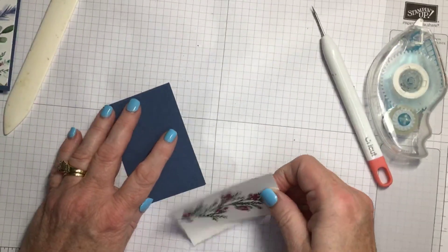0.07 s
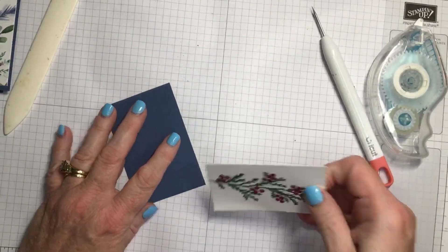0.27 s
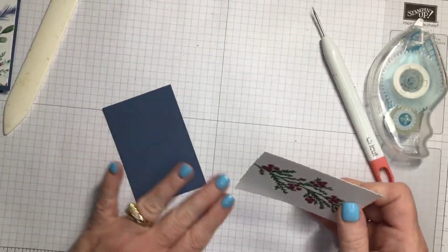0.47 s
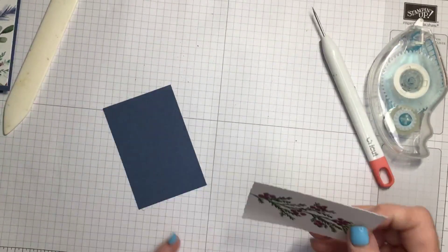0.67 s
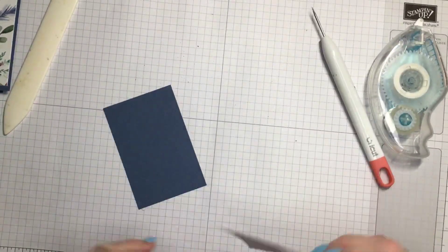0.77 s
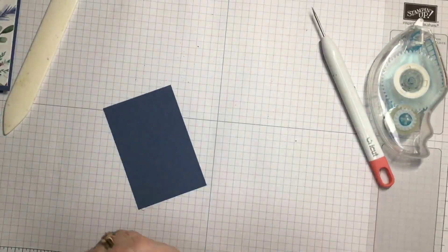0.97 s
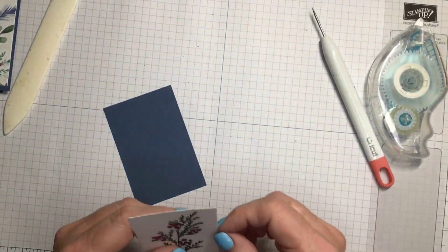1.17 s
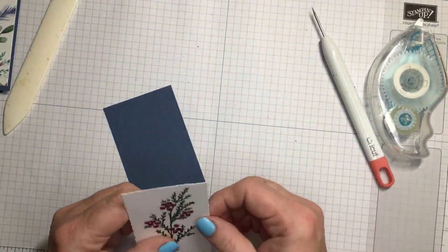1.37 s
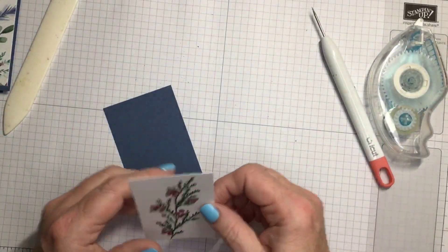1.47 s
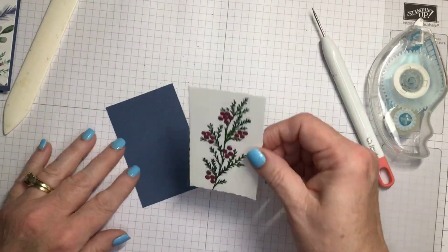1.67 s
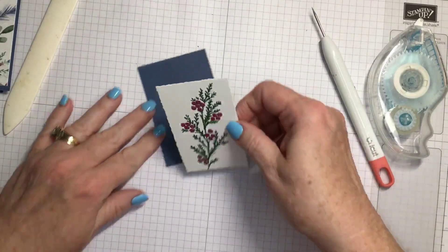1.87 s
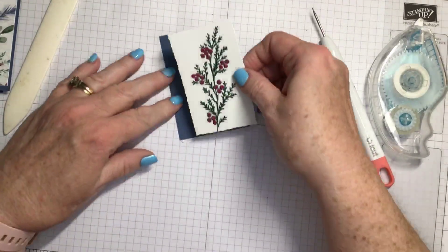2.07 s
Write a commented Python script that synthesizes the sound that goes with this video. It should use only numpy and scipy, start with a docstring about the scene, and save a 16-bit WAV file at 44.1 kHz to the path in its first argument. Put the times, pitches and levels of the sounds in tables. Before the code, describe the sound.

A stiff, tacky paper card snaps twice in quick succession, the second much louder with a small table thump, then rubs, ticks and taps lightly; close microphone in a small quiet room with a faint low engine drone.

```python
"""Room noise and a faint low drone, like an engine outside that changes gear, lie under hands sliding on paper.
A stiff paper panel, tacky with tape-runner adhesive, is handled over a craft table in a small room.
It snaps twice as it flicks free, then ticks and taps as it is turned and laid down; its edge rasps.
Snaps and taps are impulses through card resonances and a room; rubbing is dense filtered grains;
the background is shaped noise plus wavering sines."""
import sys
import numpy as np
from scipy import signal
from scipy.fft import rfft, irfft, next_fast_len
from scipy.io import wavfile
from scipy.ndimage import uniform_filter1d

SR = 44100
rng = np.random.default_rng(int(sys.argv[2]) if len(sys.argv) > 2 else 0)


def int16_out(signal):
    """Quantize to a 16-bit WAV file."""
    q = np.round(np.clip(np.atleast_2d(signal).T, -1, 1) * 32767)
    wavfile.write(sys.argv[1], SR, q.astype(np.int16))


N = 92610
PAD = next_fast_len(N + SR // 4)
HZ = np.maximum(np.arange(PAD // 2 + 1) * SR / PAD, 1)
T = np.arange(N) / SR


def from_db(db):
    """Decibels to amplitude gain."""
    return 10 ** (np.asarray(db) / 20)


def rms_one(x):
    """Scale to unit rms."""
    return x / np.sqrt(np.mean(x ** 2) + 1e-20)


def colour(points):
    """Gain at every HZ, interpolated on log frequency from (frequency [Hz], level [dB]) points."""
    hz, db = np.transpose(points)
    return from_db(np.interp(np.log(HZ), np.log(hz), db))


def filtered(x, response):
    """Pass a sound through a frequency response."""
    return irfft(rfft(x, PAD) * response, PAD)[:N]


def delay(time_s):
    """Spectrum of a unit impulse at time_s."""
    return np.exp(-2j * np.pi * HZ * time_s)


def bandpass(hz, width_hz):
    """Second-order resonator with unit gain at its peak."""
    return 1 / (1 + 1j * (HZ ** 2 - hz ** 2) / (HZ * width_hz))


def resonance(hz, width_hz, boost_db):
    """Ringing peak with unit gain far from its pitch."""
    return 1 + (from_db(boost_db) - 1) * bandpass(hz, width_hz)


def drift(knots_per_s):
    """Slow random curve with unit rms."""
    knots = rng.standard_normal(400)
    return rms_one(np.interp(T * knots_per_s, np.arange(len(knots)), knots))


# engine outside: (time [s], pitch [Hz], level [dB])
ENGINE_TRACK = [(0, 140.3, -57.5), (.25, 143.8, -56), (.40, 146.3, -58), (.48, 150.5, -72.5),
                (.54, 147, -60), (.60, 148.2, -74), (.74, 152.2, -63.5), (.80, 148.8, -63.5),
                (.87, 137.4, -54), (.95, 131.3, -70), (1.06, 119.6, -70), (1.3, 110.8, -72.5),
                (2.1, 117.4, -70)]


def engine():
    """Engine drone: one sine on a pitch track, its level wavering."""
    time_s, pitch_hz, level_db = np.transpose(ENGINE_TRACK)
    phase = 2 * np.pi * np.cumsum(np.interp(T, time_s, pitch_hz)) / SR
    wavering_db = np.interp(T, time_s, level_db) + 0.61 * drift(25.05)
    return np.sqrt(2) * from_db(wavering_db) * np.sin(phase)


# appliance tones: (pitch [Hz], level [dB])
APPLIANCE_TONES = [(188.4, -70.5), (240, -75.5), (1372, -77)]


def hums():
    """Appliance tones: sines with wavering level and phase."""
    total = np.zeros(N)
    for pitch_hz, level_db in APPLIANCE_TONES:
        gain = from_db(level_db + 2.8 * drift(9.14))
        total += gain * np.sin(2 * np.pi * pitch_hz * T + 0.62 * drift(14))
    return np.sqrt(2) * total


FLOOR_RMS_DB, LOW_CUT_HZ = -61, 88
# room noise shape before the low cut: (frequency [Hz], relative level [dB per Hz])
FLOOR_COLOUR = [(60, -33), (100, -21.5), (140, -11), (200, -5), (300, -11), (480, -20.5), (640, -18),
                (900, -21), (1400, -19), (1900, -22.5), (2750, -18.5), (3800, -24.5), (5000, -31),
                (8000, -35.5), (11000, -41), (16000, -39)]


def room_noise():
    """Room noise: white noise shaped by colour and a steep low cut."""
    low_cut = 1 / np.sqrt(1 + (LOW_CUT_HZ / HZ) ** 12)
    noise = filtered(rng.standard_normal(N), colour(FLOOR_COLOUR) * low_cut)
    return from_db(FLOOR_RMS_DB) * rms_one(noise)


STROKE_FADE = 0.36  # share of a stroke spent swelling, and again fading


def friction(strokes, spectrum, grains_per_s, size_db, flutter_db):
    """Paper fibres catch and slip in dense grains while each stroke swells and fades."""
    power = np.zeros(N)
    for start_s, length_s, level_db in strokes:
        inside = np.minimum(T - start_s, start_s + length_s - T) / (length_s * STROKE_FADE)
        swell = np.sin(np.pi / 2 * np.clip(inside, 0, 1))
        power += (from_db(level_db) * swell) ** 2
    hits = (rng.random(N) < grains_per_s / SR) * rng.choice([-1, 1], N)
    sizes = from_db(size_db * np.minimum(rng.exponential(1, N), 4))
    rubbing = rms_one(filtered(hits * sizes, spectrum))
    return np.sqrt(power) * rubbing * from_db(flutter_db * drift(90))


RUB_LOW_HZ = 250


def thin():
    """Rubbing loses its bass below RUB_LOW_HZ."""
    return 1 / (1 + (RUB_LOW_HZ / HZ) ** 4)


SLIDE_GRAINS_PER_S = 12000
# skin over paper: (start [s], length [s], level [dB])
SLIDE_STROKES = [(-.05, 0.25, -66), (.12, 0.19, -57.5), (.28, 0.17, -53), (.52, 0.22, -79),
                 (.63, .2, -57.5), (.77, 0.21, -51.5), (.945, 0.065, -58.5), (1.18, 0.022, -68),
                 (1.46, 0.071, -68.5), (1.645, 0.091, -64.5), (1.935, 0.16, -62), (2.03, 0.17, -53)]
# skin-on-paper shape before thinning: (frequency [Hz], relative level [dB per Hz])
SLIDE_SHAPE = [(300, -28), (700, -21.5), (2100, -15), (2500, -11.5), (3600, -4.5), (4600, -8), (5600, -4),
               (6800, -6), (7650, -17), (8500, -10), (11100, -15), (13500, -10.5), (16000, -15)]


def slides():
    """Hands slide over the paper mat: dense small grains of friction."""
    spectrum = colour(SLIDE_SHAPE) * thin()
    return friction(SLIDE_STROKES, spectrum, SLIDE_GRAINS_PER_S, size_db=1.5, flutter_db=0.36)


DRAG_GRAINS_PER_S, DRAG_RING_WIDTH_HZ, DRAG_RING_DB = 1600, 750, 11.5
# edge strokes, ring set by free length: (start [s], length [s], level [dB], ring pitch [Hz])
EDGE_DRAGS = [(-.05, 0.27, -65, 2800), (0.142, 0.085, -53.5, 3100), (0.236, 0.036, -53, 3820),
              (0.274, 0.089, -52, 3270), (0.365, 0.066, -46.5, 2980), (0.564, 0.088, -59.5, 2260),
              (.65, 0.07, -51.5, 2600), (0.672, 0.066, -54, 2560), (0.715, 0.044, -52.5, 2520),
              (0.963, 0.029, -59.5, 3535), (1.223, 0.043, -60, 3610), (1.283, 0.043, -57, 3160),
              (1.405, 0.035, -58.5, 3210), (1.939, 0.17, -66.5, 2674)]
# edge shape before ring and thinning: (frequency [Hz], relative level [dB per Hz])
EDGE_SHAPE = [(150, -30), (400, -17), (650, -8), (1100, -13), (1900, -7.5), (2600, -6.5), (3600, -10),
              (5000, -12.5), (7600, -18), (9000, -16.5), (16000, -25)]


def drags():
    """The card's edge rasps: sparser friction grains excite a ring of the free edge."""
    edge = colour(EDGE_SHAPE) * thin()
    total = np.zeros(N)
    for start_s, length_s, level_db, ring_hz in EDGE_DRAGS:
        spectrum = edge * resonance(ring_hz, DRAG_RING_WIDTH_HZ, DRAG_RING_DB)
        stroke = [(start_s, length_s, level_db)]
        total += friction(stroke, spectrum, DRAG_GRAINS_PER_S, size_db=2.5, flutter_db=0.36)
    return total


def causal(gain):
    """Minimum-phase response with the given gains: nothing sounds early."""
    cepstrum = irfft(np.log(gain), PAD)
    return np.exp(rfft(np.r_[cepstrum[0], 2 * cepstrum[1:PAD // 2]], PAD))


BUILD_UP_S = .0025  # time constant of growing density


def tail(t60_s):
    """Spectrum of diffuse reflections: build-up, decay, flattened colour, unit energy."""
    decay = from_db(-60 * T / t60_s) * (1 - np.exp(-T / BUILD_UP_S))
    spectrum = rfft(rng.standard_normal(N) * decay, PAD)
    smooth_power = uniform_filter1d(np.abs(spectrum) ** 2, size=700)
    return spectrum * causal(smooth_power ** -.5)


# diffuse levels apply before colour and dulling
SCATTER_DB, SCATTER_T60_S, ROOM_DB, ROOM_T60_S, ROOM_DULL_HZ = -6, 0.079, -10, 0.25, 8000
# reflections from table and wall, before dulling: (delay [s], level [dB])
REFLECTIONS = [(.0030, -10), (.0170, -18)]
# diffuse sound before dulling: (frequency [Hz], gain [dB])
DIFFUSE_COLOUR = [(200, 11.5), (900, 7), (1800, 3), (3300, -4), (4500, 0.5), (6200, 2), (14000, 0.5)]


def room(x):
    """Direct sound, discrete echoes, scatter from things on the table and a short dull tail."""
    echoes = sum(from_db(level_db) * delay(delay_s) for delay_s, level_db in REFLECTIONS)
    diffuse = from_db(SCATTER_DB) * tail(SCATTER_T60_S) + from_db(ROOM_DB) * tail(ROOM_T60_S)
    reflected = echoes + diffuse * colour(DIFFUSE_COLOUR)
    dulling = 1 / (1 + 1j * HZ / ROOM_DULL_HZ)
    return filtered(x, 1 + reflected * dulling)


THUMP_S, THUMP_DB, THUMP_HZ, THUMP_WIDTH_HZ = .393, 2, 205, 140


def thump():
    """The hardest snap shakes the table top: an impulse through a doubled low resonator."""
    ring = bandpass(THUMP_HZ, THUMP_WIDTH_HZ) ** 2
    return from_db(THUMP_DB) * irfft(ring * delay(THUMP_S), PAD)[:N]


HIGH_RING_WIDTH_HZ = 330
# knocks, plus the ringing of the snaps at 0.226 s and 0.392 s; pitches set by the grip, levels before card
# colour: (time [s], level [dB], low ring [Hz], low ring width [Hz], low boost [dB], high ring [Hz], high boost
# [dB])
CARD_TAPS = [(0.2258, -21, 2480, 440, 30, 4000, 28), (0.2257, -23.5, 1480, 400, 16.5, 5400, 32),
             (0.3924, -14, 3310, 300, 24, 8270, 27), (.7280, -26.5, 640, 400, 12, 2450, 9),
             (1.2217, -30, 800, 350, 11, 4200, 8), (1.3060, -29, 2150, 400, 20.5, 5560, 34.5),
             (1.3236, -25, 2020, 330, 28, 4000, 6), (1.5501, -26, 1000, 150, 23, 3570, 13),
             (1.5514, -31, 339.4, 150, 16, 1190, 14), (1.6144, -29.5, 1150, 301, 10, 3000, 11)]
# knocks and snap ringing relative to snaps: (frequency [Hz], gain [dB])
KNOCK_COLOUR = [(100, -12), (230, 0), (400, 1), (700, 3.5), (1000, 3), (1600, -4.5), (2500, 1.5),
                (3600, -4), (4500, -10), (15000, -9.5)]


def taps():
    """Spectrum of the knocks and of the snaps' own ringing: each an impulse exciting two brief rings."""
    total = 0
    for time_s, level_db, low_hz, low_width_hz, low_db, high_hz, high_db in CARD_TAPS:
        low_ring = resonance(low_hz, low_width_hz, low_db)
        high_ring = resonance(high_hz, HIGH_RING_WIDTH_HZ, high_db)
        rings = low_ring + high_ring - 1  # count the direct impulse once
        total = total + from_db(level_db) * rings * delay(time_s)
    return total * colour(KNOCK_COLOUR)


CRACKLE_RISE_S, CRACKLE_FALL_S, CRACKLE_GRAINS_PER_S = 0.0014, 0.0014, 7000


def contact(time_s, crackle_db):
    """Spectrum of one impulse; fibres crack separately just before and after it."""
    rise_fall = np.minimum((T - time_s) / CRACKLE_RISE_S, (time_s - T) / CRACKLE_FALL_S)
    swell = np.exp(rise_fall.clip(-60, 0))
    hits = rng.random(N) < CRACKLE_GRAINS_PER_S / SR
    crackle = rng.standard_normal(N) * hits * swell
    unit_crackle = crackle / np.sqrt(np.sum(crackle ** 2))
    return delay(time_s) + from_db(crackle_db) * rfft(unit_crackle, PAD)


BASS_HZ, TREBLE_HZ = 1200, 4700  # bass shelf end, treble slope start
# snaps and ticks, before card colour: (time [s], level [dB], bass [dB],
# treble slope [dB per octave], crackle relative to impulse [dB])
CARD_SNAPS = [(0.1842, -28, 1, -5, -2), (.1924, -17, 6.5, -2.5, 1), (0.2257, -4.5, -4.5, -7.5, -1),
              (0.2359, -15, 1.5, -20, -6), (0.2648, -15.5, 1, -22, 3.5), (0.34, -23, -24, 3, 4.5),
              (0.389, -8, -23, -8, -2), (0.3924, 4, -13.5, 2, -3), (0.393, 2, -10.5, 4, -5),
              (0.3956, -4, -1, 3, 1), (0.3999, -13.5, 9, -3, 0), (0.4024, -13, 0, 2, 4.5),
              (1.222, -27.5, 11, 0, -4), (1.2294, -29.5, 12, -1.5, 2), (1.2380, -32, 12, -1, -4),
              (1.3061, -15.5, 2, 0, 0), (1.3092, -27, 5, 0, 3), (1.314, -20.5, 11.5, 1, -0.5),
              (1.3185, -27, 11.5, -1, 3), (1.3228, -20.5, 5, -0.5, 3), (1.3869, -30, 7, -5.5, 5),
              (1.3940, -34, -1, -3, 0), (1.4990, -39.5, -5, -1, 5), (1.6070, -39, 3, -8, 3),
              (1.754, -41, 6, 2, 8), (1.932, -37, 1, -1.5, 4)]


def snaps():
    """Spectrum of the snaps and ticks: crackling contacts with their own bass and treble tilt."""
    bass = 1 / (1 + (HZ / BASS_HZ) ** 4)
    octaves = np.log2(1 + (HZ / TREBLE_HZ) ** 6) / 6
    total = 0
    for time_s, level_db, bass_db, slope_db, crackle_db in CARD_SNAPS:
        tilt = from_db(level_db + bass_db * bass + slope_db * octaves)
        total = total + tilt * contact(time_s, crackle_db)
    return total


SPREAD_S = 0.001106  # bending-wave delay at 3 kHz; lower ones arrive later
# card resonances: (pitch [Hz], width [Hz], boost [dB])
MODES = [(677, 170, 3), (1630, 180, 6), (1995, 144, 4.5), (2530, 220, 5.5), (2840, 140, 5), (3360, 530, 6),
         (4110, 150, 6.5), (4550, 330, 7), (6470, 350, 8.5), (8360, 770, 8)]
# broad colour of the card: (frequency [Hz], gain [dB])
BODY_COLOUR = [(40, -24.5), (100, -24), (200, -12.5), (400, -13), (1000, -6), (1700, -3.5), (2600, -3.5),
               (3700, -2), (5200, -5), (6800, -8), (7600, -11), (8400, -10.5), (9400, -12.5), (11000, -9),
               (16000, -14)]


def card():
    """Bending waves smear snaps and taps in time; the card's resonances colour them."""
    bending = np.exp(-4j * np.pi * SPREAD_S * np.sqrt(3000 * HZ))
    modes = np.prod([resonance(*mode) for mode in MODES], axis=0)
    body = colour(BODY_COLOUR) * modes
    return irfft((snaps() + taps()) * body * bending, PAD)[:N]


def scene():
    """Background and dry rubbing, with card and table thump in the room."""
    background = engine() + hums() + room_noise()
    rubbing = slides() + drags()
    return (background + rubbing + room(card() + thump()))[None]


CUTOFF_HZ = 16000


def record(dry):
    """Steep elliptic low-pass cuts the top."""
    low_pass = signal.ellip(10, .2, 70, CUTOFF_HZ, fs=SR, output="sos")
    return signal.sosfilt(low_pass, dry)


dry = scene()
out = record(dry)
int16_out(out)
```